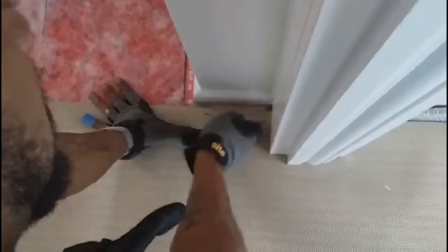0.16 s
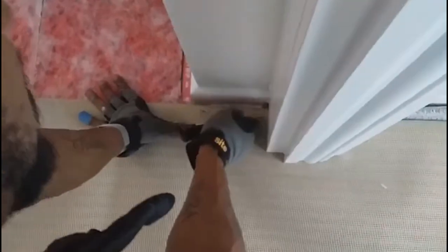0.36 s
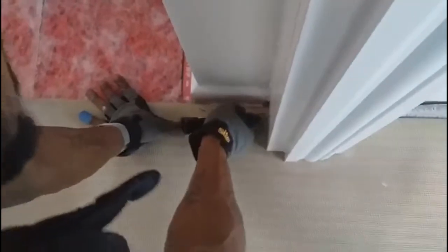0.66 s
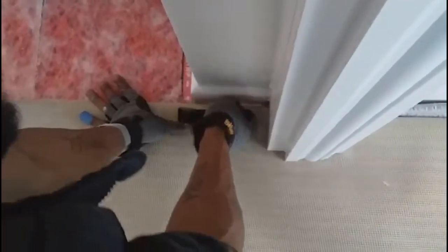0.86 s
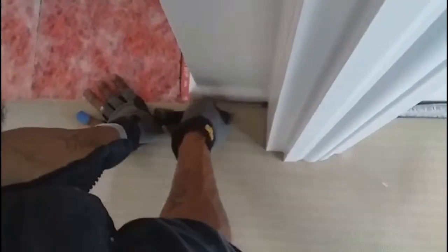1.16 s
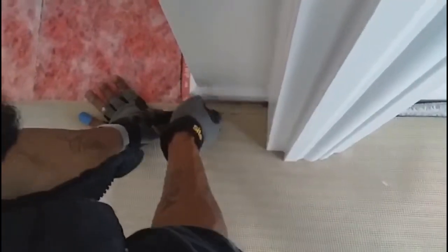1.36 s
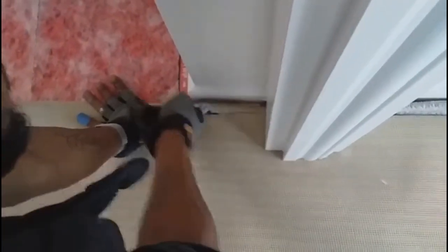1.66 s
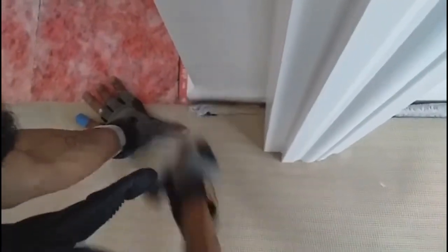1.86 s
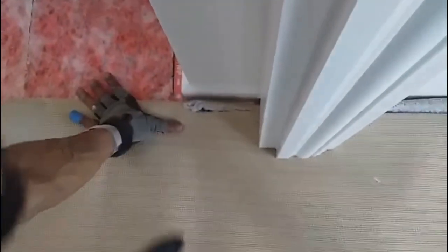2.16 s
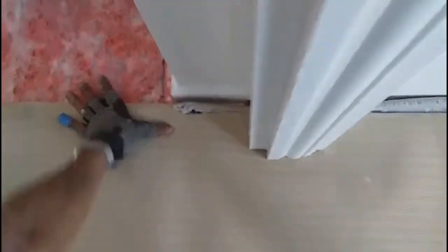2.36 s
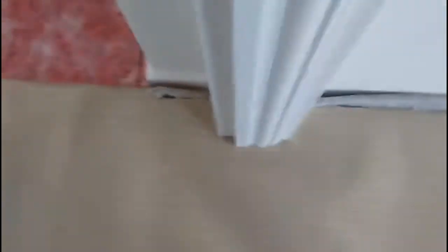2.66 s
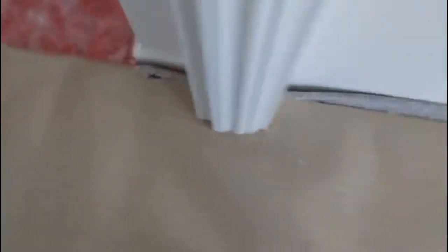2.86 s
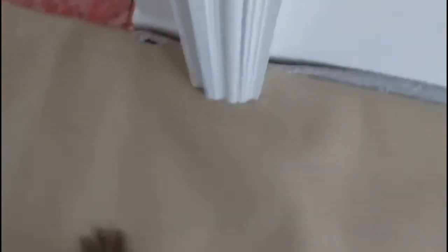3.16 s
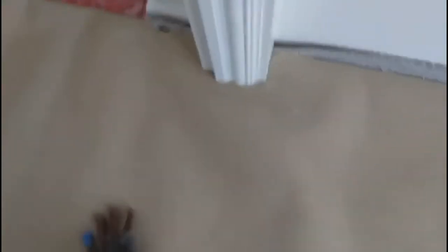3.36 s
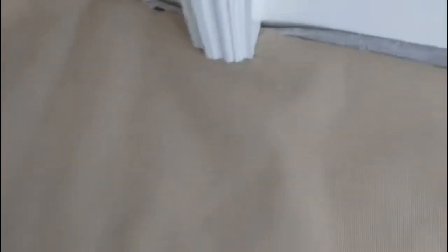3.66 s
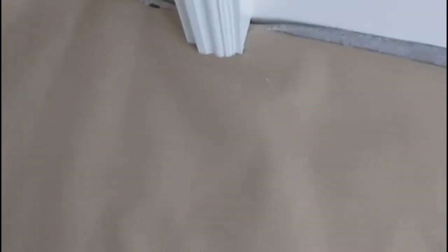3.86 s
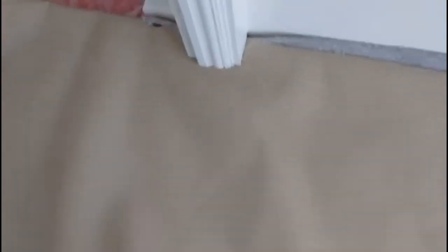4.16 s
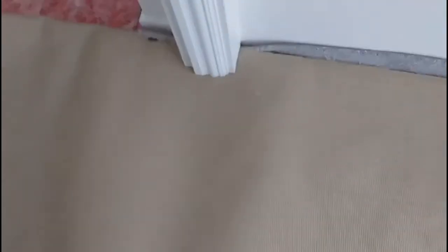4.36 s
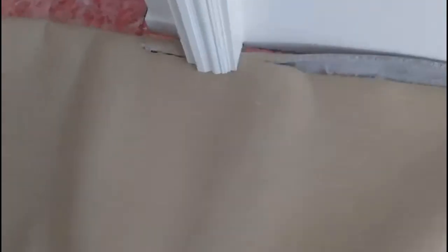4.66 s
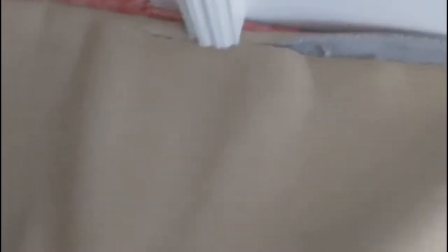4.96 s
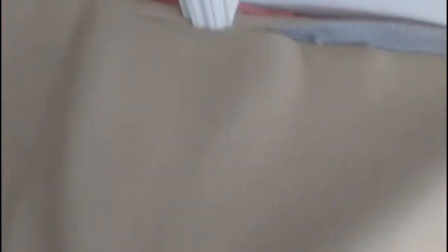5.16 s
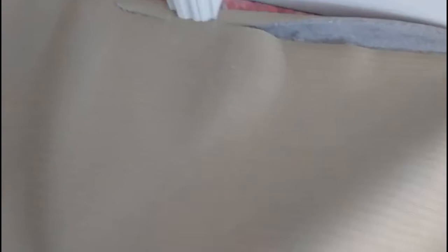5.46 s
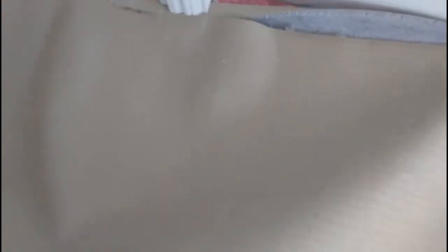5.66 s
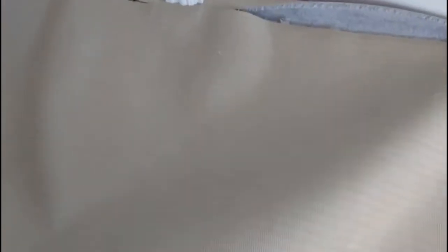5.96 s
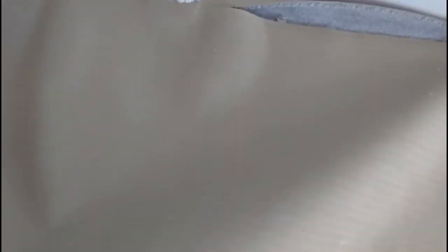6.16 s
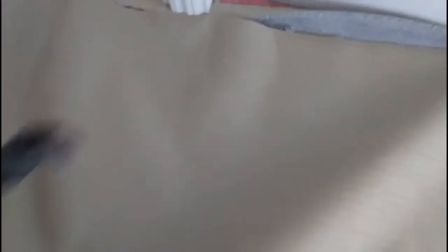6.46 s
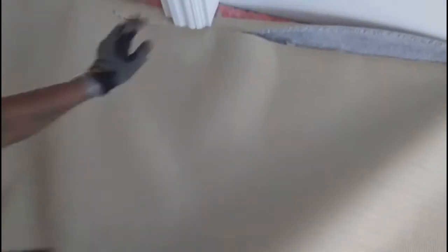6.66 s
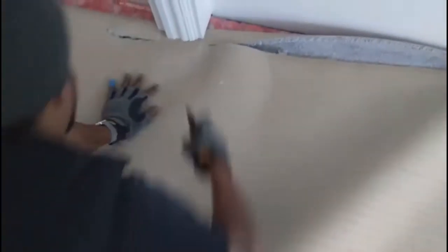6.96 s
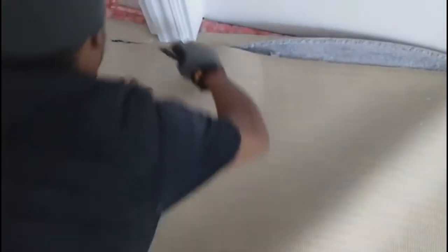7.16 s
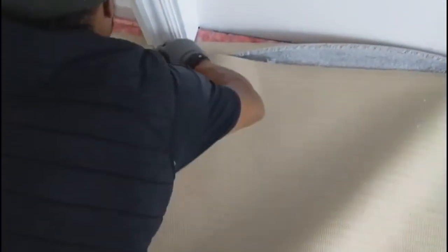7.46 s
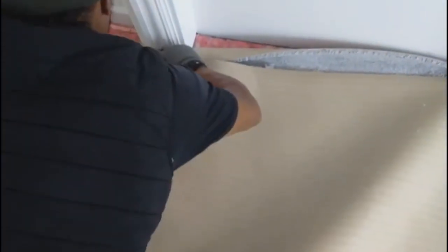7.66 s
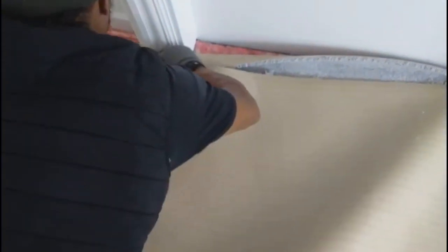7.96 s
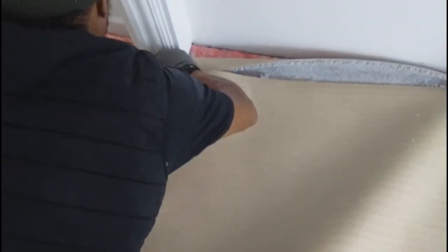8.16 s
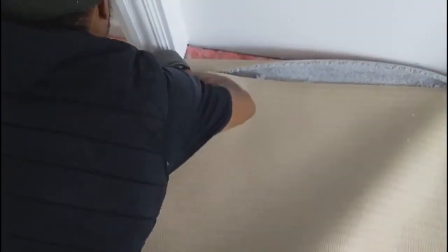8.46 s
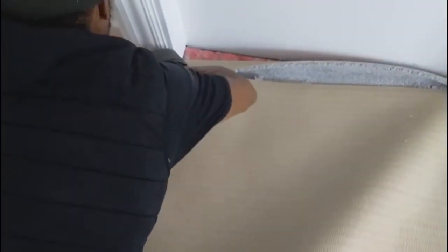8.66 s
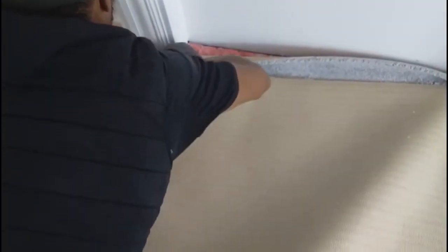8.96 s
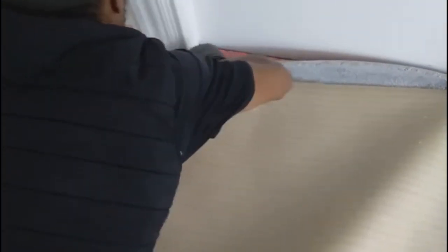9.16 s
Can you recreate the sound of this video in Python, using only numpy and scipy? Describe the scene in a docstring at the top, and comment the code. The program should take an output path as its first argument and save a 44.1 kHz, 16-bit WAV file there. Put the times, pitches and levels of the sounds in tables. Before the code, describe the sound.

A steel tool pushes carpet down along a skirting board in short, crackling scrapes. A glove swishes over the pile, knees scuff, and the sheet is dragged three times with low booms. One loud knock rings the wooden floor, a jacket rustles faintly, and the edge is wedged under a door frame with scrapes, bumps and thin squeals. One nearby microphone picks it up in a bare, quiet room.

```python
"""A short shove of carpet, then a steel tool tucking its crackling edge down along a skirting board.
One microphone, near the fitter, in a bare room with a wooden floor. His glove sweeps the pile, his knees
scuff and he drags the sheet into place: fibres catch and slip while the sheet booms under them.
He drops onto his hands with one loud knock that rings the boards, his jacket rustles, and he wedges
the edge under the door frame with bumps and thin squeals. Still air lies behind it all."""
import sys
import numpy as np
from scipy import signal
from scipy.fft import rfft, irfft, next_fast_len
from scipy.io import wavfile

SR = 44100
rng = np.random.default_rng(int(sys.argv[2]) if len(sys.argv) > 2 else 0)


def dump(signal):
    """Clip the signal to [-1, 1] and save it as 16-bit WAV at the path in sys.argv[1]."""
    limited = np.clip(np.atleast_2d(signal).T, -1, 1)
    pcm = np.round(limited * 32767).astype(np.int16)
    wavfile.write(sys.argv[1], SR, pcm)


N = 411012
TIME = np.arange(N) / SR

# Scrape is the sound of the fibres, body the boom of the sheet, treble the scrape's share above 5 kHz.
# The blade pushes along the skirting. Each row: start and hold in seconds; scrape, body, treble in dB.
TUCKS = [(0.892, 0.034, -39, -42, -3.5), (0.935, 0.081, -46, -41, -5), (1.036, 0.091, -42, -40.5, -4),
         (1.129, 0.032, -47.5, -40.5, -5), (1.237, 0.041, -53, -56, -2.5), (1.311, 0.0068, -43, -42, -4),
         (1.353, 0.0063, -38, -36, -2.5), (1.494, 0.055, -44, -41, -7), (1.63, 0.009, -60, -70, -1),
         (1.778, 0.19, -69.5, -98, 1)]
# It wedges the edge under the door frame. Each row: as for a tuck, then squeal in dB and its pitch in Hz.
WEDGES = [(8.523, 0.015, -56.5, -46, -2.5, -60, 6200), (8.571, 0.12, -46, -47, -7.5, -58, 6140),
          (8.661, 0.058, -44.5, -46.5, -9, -59, 6070), (8.77, 0.024, -45.5, -47.5, -8.5, -61, 6150),
          (8.833, 0.038, -49.5, -60, -11, -62, 6100), (8.891, 0.23, -44, -44.5, -8, -54.5, 6050),
          (8.985, 0.036, -43.5, -43, -6, -47, 5900), (9.097, 0.1, -31, -33.5, -7.5, -42, 6160),
          (9.254, .07, -30, -32.5, -7.5, -47, 6100)]
# Carpet rubbed or moved. Each row: start, rise and hold in seconds; scrape, body and treble in dB.
OPENING_SHOVE = [(0.0, 0.00054, 0.011, -49, -40, -9)]
SHEET_PULLS = [(4.395, 0.039, 0.086, -45.5, -38, -12.5), (4.5, 0.048, 0.044, -37, -31, -14),
               (4.61, 0.063, 0.17, -40, -34, -12.5), (4.903, 0.019, 0.017, -41, -48, -7),
               (4.95, 0.06, 0.11, -41, -34.5, -9.5), (5.29, 0.037, 0.086, -42.5, -34.5, -11.5)]
KNEE_SCUFFS = [(3.22, 0.019, 0.26, -55.5, -64, -10.5), (3.455, 0.1, 0.0058, -43, -48, -8),
               (3.68, 0.02, 0.16, -53, -63.5, -15), (3.845, 0.064, 0.013, -35.5, -44.5, -16),
               (4.0, 0.089, 0.16, -50.5, -52.5, -15), (4.19, 0.022, 0.016, -48.5, -62, -8),
               (4.29, 0.041, 0.093, -57.5, -61, -21)]  # knees and shoes, backing away
CRAWL_SHUFFLES = [(1.98, 0.03, 0.095, -64.5, -74, 0), (2.22, 0.011, 0.17, -65, -68.5, -7),
                  (5.155, 0.0076, 0.014, -46, -72, -0.5), (5.54, 0.057, 0.0086, -43.5, -47, -2),
                  (5.68, 0.11, 0.27, -57, -64.5, -4), (5.87, 0.087, 0.023, -49.5, -59.5, -5),
                  (6.04, 0.13, 0.51, -57.5, -66, -6), (6.165, 0.073, 0.034, -53.5, -51, -2.5),
                  (6.46, 0.046, 0.028, -49.5, -55, -1), (6.53, 0.015, 0.04, -52, -67.5, -11),
                  (6.65, 0.027, 0.25, -61.5, -79, -9)]  # shifting weight and crawling
# A glove over the pile. Each row: as for a pull, then the swish's pitch at full speed in Hz.
GLOVE_SWEEPS = [(2.467, 0.087, 0.0064, -45, -48.5, -4.5, 3530), (2.653, 0.092, 0.025, -28, -41, -3, 4370),
                (2.895, 0.055, 0.2, -25, -38, -10, 2250)]
# Plain swells. Each row: start, rise and hold in seconds, level in dB.
HEAVES = [(4.513, 0.02, 0.1, -26), (4.955, 0.022, 0.089, -35), (5.324, 0.023, 0.077, -29.5)]  # the heaviest moments of the pulls
JACKET_RUSTLES = [(6.794, 0.19, 0.16, -59), (7.152, 0.075, 0.23, -63.5), (7.487, 0.032, 0.074, -68),
                  (7.678, 0.055, 0.24, -74), (7.938, 0.036, 0.066, -72), (8.055, 0.026, 0.058, -53.5),
                  (8.249, 0.052, 0.059, -67.5), (8.365, 0.011, 0.13, -66.5)]
# The jacket's weave zips over itself. Each row: as for a rustle, then pitch in Hz at the end of the rise.
JACKET_ZIPS = [(0.08, 0.06, 0.16, -73.5, 4380), (0.57, 0.012, 0.0071, -76, 6530)]

# Brief contacts. Each row: time in seconds, relative level in dB.
BACKING_SNAPS = [(0.8875, -29.5), (0.9053, -18.5), (0.9075, -26), (0.9135, -32), (0.9422, -31),
                 (0.947, -27), (0.967, -37), (1.0205, -42), (1.041, -26), (1.0639, -27), (1.0978, -23),
                 (1.112, -26), (1.137, -27), (1.1437, -27.5), (1.151, -24), (1.1535, -27), (1.2495, -41),
                 (1.2934, -38), (1.3278, -29), (1.3597, -24), (1.3655, -19), (1.3742, -18), (1.381, -32),
                 (1.51, -24), (1.518, -31), (1.531, -25.5), (1.554, -29), (1.566, -24.5), (1.581, -40),
                 (2.48, -52), (2.651, -29), (3.42, -32.5), (3.532, -35), (3.557, -19.5), (3.564, -24),
                 (3.734, -26), (3.743, -29), (4.422, -47)]  # stiff backing snaps past the board
BLADE_TICKS = [(1.4888, -25), (1.4907, -22.5), (1.6335, -27), (2.257, -39), (2.323, -37), (3.39, -36.5)]
BLADE_RASPS = [(0.9055, -25), (8.534, -46), (8.579, -29), (8.615, -29), (8.674, -23), (8.68, -20.5),
               (8.779, -23.5), (8.792, -35), (8.858, -39), (9.011, -25), (9.063, -26), (9.107, -30)]
FIST_BUMPS = [(8.533, -39.5), (8.672, -48), (8.783, -39), (8.835, -42.5), (8.885, -40), (8.917, -38.5),
              (9.101, -27), (9.214, -24), (9.266, -27.5)]
HAND_LANDING = [(6.8785, -13.5), (6.8842, 1), (6.8895, -24.5)]  # the hand with the tool, tip first
KNEE_THUDS = [(0.47, -57), (2.6, -40.5), (3.328, -47), (3.358, -50.5), (3.56, -48), (5.33, -39),
              (5.885, -56.5), (7.728, -66.5), (7.98, -61.5), (8.3, -62.5)]
# The tool clinks. Each row: time in seconds, relative level in dB, most excited pitch in Hz,
# fall of the other modes in dB per octave.
TOOL_CLINKS = [(5.153, -43, 3460, 16), (5.166, -34.5, 3800, 35), (5.8423, -37, 5400, 2.5),
               (5.86, -48, 6400, 11), (6.557, -35, 3160, 18), (8.121, -44, 5880, 28),
               (8.143, -60, 5880, 25)]

# Struck modes. Each row: pitch in Hz, relative level in dB, seconds to fall 60 dB before extra damping.
BOARD_MODES = [(80, -4.5, .75), (96, 0, 0.53), (120, 0, 0.19), (142, -3, 0.37), (173, -2.5, 0.3),
               (197, -6.5, 0.24), (224, -2.5, 0.23), (367, 0.5, 0.19), (425, -6.5, 0.49), (445, -0.5, 0.42),
               (535, -12.5, .5), (700, -7.5, 0.28), (796, -8, 0.3)]
UNDERLAY_MODES = [(111.6, -8, .12), (162, 4, 0.1), (308, -11.5, 0.16), (428, -12, 0.26)]  # the padded floor under the fist
FLOOR_GIVE_MODES = [(103, -6.5, .07), (178, 1, 0.059), (387, -11.5, 0.02), (790, 4, 0.033)]  # the padded floor giving way under the knock
STEEL_MODES = [(3170, 0, .012), (3660, -0.5, .011), (4130, -1, .01), (4525, -8.5, 0.0083),
               (5300, -3, 0.015), (5880, 1, .008), (6630, -0.5, .009), (7450, -1.5, .006), (8200, -1, .006)]  # the tool, deadened by the glove

# Resonances that rubbing excites. Each row: centre in Hz, width in Hz, gain of the added band in dB.
GAP_PEAKS = [(79.4, 6, 3), (157.5, 34, 6), (396, 45, -26), (484, 27, -4.5), (953, 90, -11), (2040, 72, -14),
             (3010, 120, -12), (3410, 380, 2)]  # the hollow under the skirting
BLADE_PEAKS = [(169, 52, 7.5), (284, 23, 4), (433, 30, 0), (553, 12, 4.5), (740, 45, -1), (940, 18, 10),
               (1360, 59, -16), (2260, 170, 1), (2790, 30, 6), (3150, 190, 0), (4260, 120, -10)]  # the blade against the frame
SHOVE_PEAKS = [(400, 54, 4.5), (560, 80, -9), (940, 66, -2), (1510, 200, -5)]
PULL_PEAKS = [(84, 5.2, -2), (165, 35, 2.5), (400, 57, -9), (468, 8.7, -10), (875, 67, -15.5)]
SWEEP_PEAKS = [(906, 91, -3.5), (1540, 69, -10), (2710, 78, -1), (3550, 180, -7.5)]
RASP_PEAKS = [(1090, 88, 2.6), (2350, 150, 12), (3360, 81, 6.6), (6260, 250, 13)]
SCUFF_PEAKS = [(1620, 180, -4.0), (590, 96, -0.5), (2150, 160, -10), (3460, 300, -12)]

# The spectrum of each noise. Each row: frequency in Hz, relative level in dB.
TUCK_COLOUR = [(29, -57), (50, -26), (81, -7), (185, 3.5), (255, -1), (335, 6.5), (543, -5.5), (963, -11.5),
               (1520, -11.5), (2770, -18.5), (3400, -23.5), (4910, -25.5), (10500, -28), (12000, -34),
               (15600, -51), (22000, -120)]
WEDGE_COLOUR = [(29, -47), (50, -14), (81, 2), (161, -2), (232, -9), (299, -1.5), (351, -8), (543, -8),
                (595, -16), (941, -23.5), (1240, -19.5), (2830, -24.5), (3480, -29), (6170, -35),
                (12000, -43), (15600, -67), (22000, -120)]
SHOVE_COLOUR = [(35, -60), (60, -29), (91, -11), (242, -10), (386, -12), (441, -19), (527, -10), (687, -12),
                (768, -6.5), (1120, -9), (8420, -11), (12000, -16), (15600, -73), (22000, -120)]
PULL_COLOUR = [(29, -44), (52, -11), (78, -1.5), (140, -12), (176, -2), (267, -9.5), (306, -1.5),
               (368, -14), (484, -12), (595, -17), (1130, -25.5), (1330, -26.5), (4910, -35),
               (10500, -43.5), (12000, -50), (15600, -80), (22000, -120)]
SWEEP_COLOUR = [(29, -41), (50, -18.5), (212, -3.5), (343, -4), (495, -11), (920, -11.5), (1010, -10),
                (1560, -5.5), (2410, -10), (3640, -7), (8700, -7), (12000, -15.5), (15600, -50.5),
                (22000, -120)]
SCUFF_COLOUR = [(29, -46.5), (50, -5), (154, 2), (376, 1.5), (582, -2.5), (784, -5.5), (2100, -10),
                (2410, -9), (3170, -9), (3990, -9), (10900, 2), (12000, -8), (15600, -65), (22000, -120)]
SHUFFLE_COLOUR = [(29, -47), (50, -21.5), (69, -9), (161, 1), (442, -7), (1300, -6.5), (1830, -8),
                  (3100, -7), (5500, -15), (10900, -20.5), (12000, -29), (15600, -62), (22000, -120)]
JACKET_COLOUR = [(300, -21), (700, -16), (1100, -10), (2500, -12), (4200, -8), (5800, -8), (9200, -15),
                 (12000, -21)]
BOOM_COLOUR = [(24, -59.5), (40, -33.5), (86, 7), (198, -17), (304, -14.5), (456, -9), (608, -17.5),
               (869, -18.5), (1210, -34), (1470, -27), (1900, -29), (2730, -36), (4730, -32.5),
               (10700, -41.5), (12000, -53.5), (15600, -88.5), (22000, -120)]  # floor and walls after the knock
AIR_COLOUR = [(20, -42.5), (45, -15.5), (70, -13), (105, -6), (173, -25), (240, -21), (320, -27.5),
              (640, -32), (1500, -35.5), (3000, -38), (12000, -45)]
WALL_COLOUR = [(100, 0.99), (10000, -1.2)]
# The ring of the bare room. Each row: frequency in Hz, seconds to fall 60 dB.
ROOM_T60 = [(80, 0.58), (250, 0.52), (1000, 0.53), (3000, 0.42), (6000, 0.38), (11000, 0.36)]

# How strokes fade. Each pair: sag while held, then release, both in dB per second.
PUSH_FADE, SWEEP_FADE, PULL_FADE = (33, 314), (77, 332), (13, 165)
HEAVE_FADE, SCUFF_FADE, CLOTH_FADE = (83, 165), (2, 170.5), (2, 160)
PUSH_RISE_S = 0.016  # the blade always bites at once


def tucking(walls):
    """The blade forces the edge down, ticking, rasping and squealing on wood; the fist bumps the floor."""
    tucks = rub(pushes(TUCKS), PUSH_FADE, TUCK_COLOUR, GAP_PEAKS,
                slips_per_s=1000, grain_db=3.5, judder_db=1.2)
    wedges = rub(pushes(row[:-2] for row in WEDGES), PUSH_FADE, WEDGE_COLOUR, BLADE_PEAKS,
                 slips_per_s=900, grain_db=-0.5, judder_db=0.9)
    squeals = sum(from_db(db) * sing(swell(start, PUSH_RISE_S, hold, *PUSH_FADE), hz, width_hz=230)
                  for start, hold, *_, db, hz in WEDGES)
    snaps = backing_snaps()
    ticks = cut(bursts(BLADE_TICKS, decay_s=0.0031), [2600, 6400], "band")
    rasps = cut(bursts(BLADE_RASPS, decay_s=0.0046), 600, "high", order=1)
    rasps = from_db(-4.5) * resonate(cut(rasps, 1780, "low", order=1), RASP_PEAKS)
    bumps = ring(cut(clicks(FIST_BUMPS), [80, 650], "band"), UNDERLAY_MODES)
    pressing = tucks + wedges + squeals + rasps + bumps
    return room(pressing, walls, wet_db=-6.5) + room(snaps + ticks, walls, wet_db=-4)


def backing_snaps(crackles_per_s=50, spread_db=8):
    """Stiff backing snaps into the hollow gap; lesser crackles come at random, louder in a hard push."""
    chance, weakness = rng.random((2, N))
    crackles = []
    for start, hold, scrape, *_ in TUCKS:
        pushing = (TIME > start) & (TIME < start + PUSH_RISE_S + hold)
        for i in np.flatnonzero(pushing & (chance < crackles_per_s / SR)):
            crackles.append((TIME[i], scrape - spread_db * weakness[i]))
    snaps = cut(bursts(BACKING_SNAPS + crackles, decay_s=0.001), 500, "high", order=1)
    return from_db(-1) * resonate(cut(snaps, 7600, "low", order=1), GAP_PEAKS)


def knock(walls):
    """The tool lands with a crack, the padded floor gives, the boards ring and the room booms."""
    force = clicks(HAND_LANDING)
    give = from_db(-18) * ring(force, FLOOR_GIVE_MODES)
    boards = from_db(-20.5) * ring(force, BOARD_MODES)
    crack = cut(bursts(HAND_LANDING, decay_s=0.0035), 250, "high", order=1)
    crack = from_db(-7.5) * resonate(cut(crack, 5400, "low"), [(3950, 1600, -1.4)])
    diffuse = signal.fftconvolve(force, tail(BOOM_COLOUR, build_s=0.00055))[:N]
    boom = from_db(20.5) * cut(diffuse, 120, "high")  # the deepest notes are left to the boards
    return give + boards + room(crack, walls, wet_db=-7) + boom


def carpet_rubbing(walls):
    """Glove and knees brush the pile, and the whole sheet is shoved and dragged over the underlay."""
    shove = rub(OPENING_SHOVE, PULL_FADE, SHOVE_COLOUR, SHOVE_PEAKS,
                slips_per_s=1400, grain_db=-5, judder_db=1.4)
    scuffs = rub(KNEE_SCUFFS, SCUFF_FADE, SCUFF_COLOUR, SCUFF_PEAKS,
                 slips_per_s=1200, grain_db=-2.5, judder_db=1.5)
    pulls = rub(SHEET_PULLS, PULL_FADE, PULL_COLOUR, PULL_PEAKS,
                slips_per_s=1900, grain_db=-2.5, judder_db=-1)
    shuffles = rub(CRAWL_SHUFFLES, SCUFF_FADE, SHUFFLE_COLOUR, peaks=[],
                   slips_per_s=1700, grain_db=-4, judder_db=0.5)
    return room(shove + glove_sweeps() + scuffs + pulls + shuffles, walls, wet_db=-7)


def glove_sweeps(swish_db=-5, rasp_db=1.56):
    """The glove rasps over the ribs of the weave; its swish rises and falls with the speed of the hand."""
    swish = 0
    for start, rise, hold, scrape, *_, hz in GLOVE_SWEEPS:
        speed = swell(start, rise, hold, *SWEEP_FADE)
        swish += from_db(scrape + swish_db) * sing(speed, hz * speed ** 0.64, width_hz=2200)
    fibres = rub([row[:-1] for row in GLOVE_SWEEPS], SWEEP_FADE, SWEEP_COLOUR, SWEEP_PEAKS,
                 slips_per_s=3000, grain_db=-3, judder_db=-0.5)
    return (fibres + resonate(swish, SWEEP_PEAKS)) * from_db(rasp_db * drift(450))


def heaves(walls, hz=174, wander_hz=11, flutter_db=1):
    """At the height of a pull the sheet judders over the underlay with a low, wavering boom."""
    level = sum(from_db(db) * swell(*timing, *HEAVE_FADE) for *timing, db in HEAVES)
    phase = 2 * np.pi * np.cumsum(hz + wander_hz * drift(80)) / SR
    boom = level * from_db(flutter_db * drift(65)) * rms_one(np.sin(phase))
    return room(boom, walls, wet_db=-13.5)


def knee_thuds(walls):
    """Knees and feet press softly through the padding, so the boards ring only briefly."""
    force = cut(clicks(KNEE_THUDS), 320, "low", order=1)
    return room(ring(force, BOARD_MODES, damping=2.8), walls, wet_db=6)


def tool_clinks(walls):
    """The steel chatters and rings briefly in the modes that each contact favours."""
    steel = 0
    for hz, mode_db, t60 in STEEL_MODES:
        contacts = [(s, db - fall * abs(np.log2(hz / centre))) for s, db, centre, fall in TOOL_CLINKS]
        steel += ring(bursts(contacts, decay_s=0.027), [(hz, mode_db, t60)])
    chatter = cut(bursts([row[:2] for row in TOOL_CLINKS], decay_s=0.0065), 2800, "high")
    return room(from_db(-19) * steel + from_db(-2.5) * chatter, walls, wet_db=-5)


def jacket(walls, zip_fall_hz_per_s=970, flutter_db=1):
    """Smooth cloth slides on itself: a soft, uneven hiss, and thin zips that fall as it slows."""
    level = sum(from_db(db) * swell(*timing, *CLOTH_FADE) for *timing, db in JACKET_RUSTLES)
    cloth = level * coloured(rng.standard_normal(N), JACKET_COLOUR)
    for start, rise, hold, db, hz in JACKET_ZIPS:
        pitch = hz - zip_fall_hz_per_s * (TIME - start - rise)
        cloth += from_db(db) * sing(swell(start, rise, hold, *CLOTH_FADE), pitch, width_hz=480)
    return room(cloth * from_db(flutter_db * drift(70)), walls, wet_db=-6.5)


def still_air():
    """Room tone: a faint, low noise under the work."""
    return from_db(-65.5) * coloured(rng.standard_normal(N), AIR_COLOUR)


def room(x, walls, wet_db):
    """The microphone hears the direct sound plus the ring of the walls, at about the same total power."""
    reflected = from_db(wet_db) * signal.fftconvolve(x, walls)[:N]
    return (x + reflected) / np.hypot(1, from_db(wet_db))


def tail(spectrum, build_s):
    """A second of diffuse sound that builds up and dies band by band; energy 1."""
    t, out = TIME[:SR], 0
    noise = rfft(coloured(rng.standard_normal(SR), spectrum))  # one bin per Hz
    centres, t60s = np.transpose(ROOM_T60)
    for share, t60 in zip(np.eye(len(centres)), t60s):
        band = at_hz(np.c_[centres, share], np.arange(len(noise)))
        out += irfft(noise * band, SR) * np.exp(-np.log(1000) * t / t60)
    out *= 1 - np.exp(-t / build_s)
    return out / np.linalg.norm(out)


def rub(strokes, fade, colour, peaks, slips_per_s, grain_db, judder_db):
    """Fibres catch and let go over a smooth hiss; the sheet of carpet booms under them."""
    sizes = from_db(2.2 * np.minimum(rng.exponential(1, N), 4)) * rng.choice([-1, 1], N)
    slips = rms_one(sizes * (rng.random(N) < slips_per_s / SR))
    friction = (rng.standard_normal(N) + from_db(grain_db) * slips) * from_db(judder_db * drift(130))
    friction = resonate(coloured(friction, colour), peaks)
    low = rms_one(cut(friction, 700, "low", order=4))
    middle = rms_one(cut(friction, [700, 5000], "band", order=4))
    high = rms_one(cut(friction, 5000, "high", order=4))
    # overlapping strokes add in power
    power = np.array([swell(*row[:3], *fade) ** 2 for row in strokes])
    scrape, body, treble = from_db([row[3:] for row in strokes]).T ** 2
    bright = np.clip(treble, 0, .9)
    return (np.sqrt(body @ power) * low
            + np.sqrt(scrape * (1 - bright) @ power) * middle
            + np.sqrt(scrape * bright @ power) * high)


def swell(start, rise, hold, sag, release, touch_db=-16.5, touch_s=0.0061):
    """Gain of one stroke: the hand settles lightly, speeds up, tires while held and lets go."""
    t = TIME - start
    touch = from_db(touch_db) * np.exp(np.clip(t / touch_s, -20, 0))
    attack = np.minimum(touch + np.maximum(t, 0) / rise, 1)
    return attack * from_db(-sag * np.clip(t - rise, 0, hold) - release * np.clip(t - rise - hold, 0, 1))


def pushes(rows):
    """Strokes of the blade, all with the same quick rise."""
    return [(start, PUSH_RISE_S, *rest) for start, *rest in rows]


def sing(level, hz, width_hz):
    """Friction gathers round one pitch: noise in a resonance that can glide."""
    on = level > level.max() / 1000
    turn = np.exp(2j * np.pi * np.cumsum((hz + np.zeros(N))[on]) / SR)
    r = np.exp(-np.pi * width_hz / SR)
    narrow = signal.lfilter([1], [1, -2 * r, r * r], rng.standard_normal(N)[on] / turn)
    out = np.zeros(N)
    out[on] = rms_one(np.real(turn * narrow))
    return level * out


def bursts(rows, decay_s):
    """Each contact breaks into a dying burst of tiny slips."""
    envelope = signal.lfilter([1], [1, -np.exp(-1 / (decay_s * SR))], clicks(rows) + 1e-18)
    return envelope * rng.standard_normal(N)


def clicks(rows):
    """One impulse for each row of time in seconds and level in dB."""
    out = np.zeros(N)
    for s, db in rows:
        out[round(s * SR)] += from_db(db)
    return out


def ring(force, modes, damping=1):
    """Struck modes: a click starts each as a dying sine."""
    out = 0
    for hz, db, t60 in modes:
        r, w = np.exp(-np.log(1000) * damping / (t60 * SR)), 2 * np.pi * hz / SR
        out += from_db(db) * signal.lfilter([0, np.sin(w)], [1, -2 * r * np.cos(w), r * r], force + 1e-18)
    return out


def resonate(x, peaks):
    """Add resonant bands to a signal."""
    out = x
    for hz, width, db in peaks:
        r = np.exp(-np.pi * width / SR)
        poles = [1, -2 * r * np.cos(2 * np.pi * hz / SR), r * r]
        out = out + from_db(db) * signal.lfilter([(1 - r * r) / 2, 0, (r * r - 1) / 2], poles, x)
    return out


def coloured(x, spectrum):
    """Give a steady signal a smooth spectrum; rms 1."""
    size = next_fast_len(len(x))
    hz = np.arange(size // 2 + 1) * SR / size
    return rms_one(irfft(rfft(x, size) * from_db(at_hz(spectrum, hz)), size)[:len(x)])


def drift(rate):
    """Random wander through `rate` points a second; rms 1."""
    return rms_one(np.interp(TIME * rate, np.arange(N // 20), rng.standard_normal(N // 20)))


def cut(x, hz, kind, order=2):
    """Causal Butterworth filter."""
    return signal.sosfilt(signal.butter(order, hz, kind, fs=SR, output="sos"), x + 1e-18)


def at_hz(points, hz):
    """Read a table on a log-frequency axis."""
    f, value = np.transpose(points)
    return np.interp(np.log(hz + 1e-9), np.log(f), value)


def from_db(db):
    """Decibels to gain."""
    return 10 ** (np.asarray(db) / 20)


def rms_one(x):
    """Scale to rms 1."""
    return x / np.sqrt(np.mean(x ** 2) + 1e-20)


def scene():
    """All the work rings in the same bare room, over its still air; one channel."""
    walls = tail(WALL_COLOUR, build_s=0.00046)
    air = still_air()
    carpet = tucking(walls) + carpet_rubbing(walls) + heaves(walls)
    contacts = knock(walls) + knee_thuds(walls) + tool_clinks(walls)
    return (carpet + contacts + jacket(walls) + air)[None]


def record(dry, peak_limit=.9, top_hz=11900):
    """The microphone loses the deep bass, the highest peak is rounded, the top is cut."""
    thin = cut(dry, 75, "high", order=3)
    rounded = thin / (1 + (thin / peak_limit) ** 4) ** .25
    return signal.sosfilt(signal.ellip(10, .2, 70, top_hz, fs=SR, output="sos"), rounded)


dry = scene()
out = record(dry)
dump(out)
```